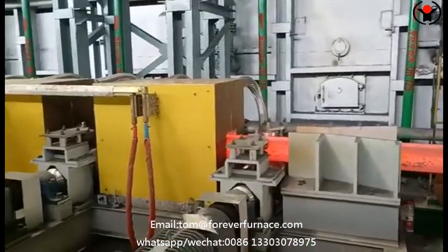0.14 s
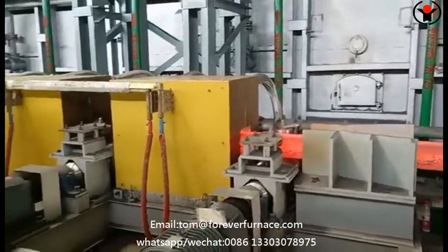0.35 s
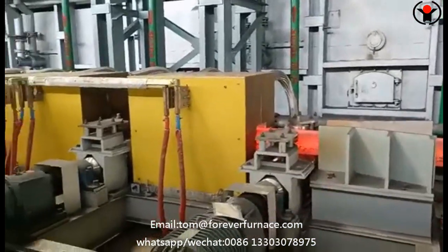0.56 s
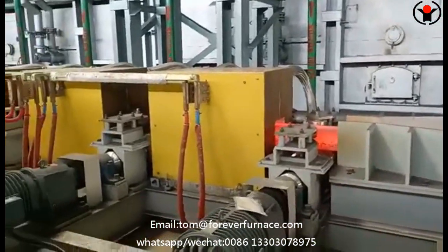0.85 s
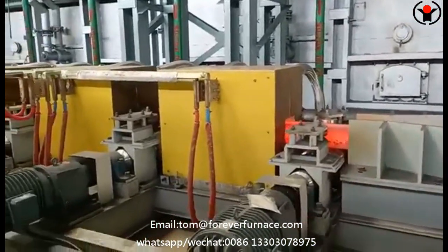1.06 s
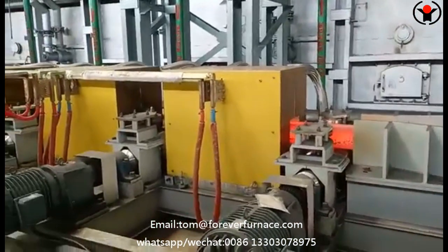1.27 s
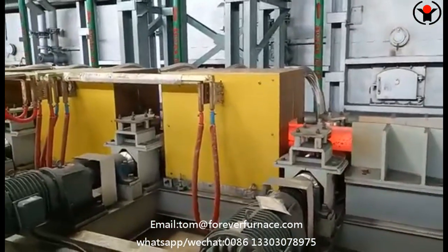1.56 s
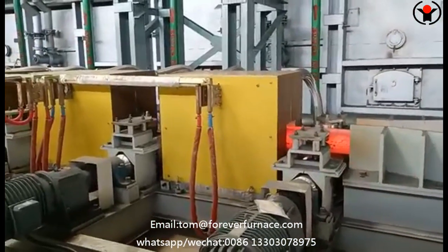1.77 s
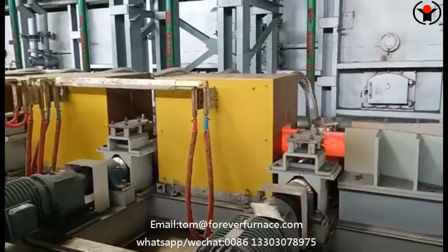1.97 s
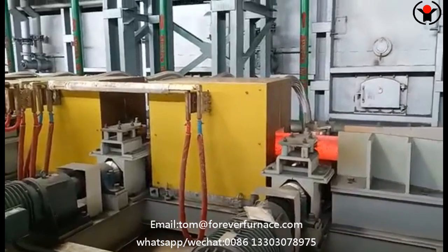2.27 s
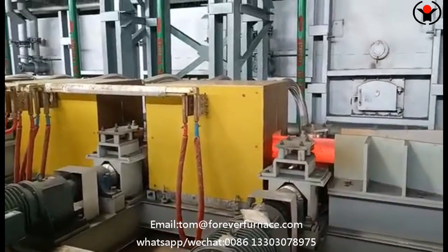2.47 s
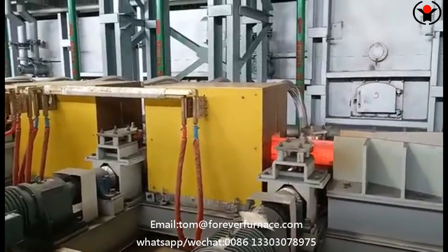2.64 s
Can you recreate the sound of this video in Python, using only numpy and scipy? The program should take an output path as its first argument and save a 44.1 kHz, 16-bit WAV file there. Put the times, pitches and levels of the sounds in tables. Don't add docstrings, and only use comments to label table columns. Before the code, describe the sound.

A piercing electrical whine dominates from 0 s, gliding from about 1525 to 1554 Hz by 2.6 s beside a weaker steady 1484 Hz tone. It is strongest early, shifts right around 0.4-1.1 s with brief pumping from 0.7 s, then thins and wavers between sides after 1.2 s as rumble and hiss come forward. Short low groans come from 0.7 to 2.7 s; no ending.

```python
import sys
import numpy as np
from scipy import signal
from scipy.fft import rfft, irfft, next_fast_len
from scipy.io import wavfile
from scipy.ndimage import uniform_filter1d, map_coordinates

SR = 44100
rng = np.random.default_rng(int(sys.argv[2]) if len(sys.argv) > 2 else 0)


def level_to_linear(level):
    exponent = np.asarray(level, float) / 20
    return 10 ** exponent


def transcribe(signal):
    frames = np.atleast_2d(signal).T
    limited = np.clip(frames, -1, 1)
    pcm = np.round(limited * 32767).astype(np.int16)
    wavfile.write(sys.argv[1], SR, pcm)


N = 123921
PORTS = np.array([[1], [-1]])


def unit(x):
    return x / np.sqrt(np.mean(x ** 2) + 1e-20)


def along(points, hz):
    f, value = np.transpose(points)
    return np.interp(np.log(hz + 1), np.log(f + 1), value)


def curves(rows):
    s, *columns = np.transpose(rows)
    t = np.arange(N) / SR
    return np.array([np.interp(t, s, column) for column in columns])


def wobble(rate):
    at = [np.arange(N) * rate / SR]
    count = int(N * rate / SR) + 4
    return np.array([map_coordinates(knots[:count], at) for knots in rng.standard_normal((2, 1500))])


def filtered(x, response):
    m = next_fast_len(N + SR // 2)
    hz = np.fft.rfftfreq(m, 1 / SR)
    return irfft(rfft(x, m) * response(hz), m)[..., :N]


def partial(phase, field, ripple_db, order):
    left_db, right_db, lead = curves(field)
    t = np.arange(N) / SR
    ripple_early_db = -9 / (1 + np.exp((t - 1.2) / 0.08))
    depth = 2 * level_to_linear(ripple_db + ripple_early_db + 3 * wobble(3))
    beat = 2 * np.pi * 33.4 * t + wobble(1.5)

    shimmer_db = 0.1 * order ** 2 * wobble(22)
    wide_skirt = level_to_linear(-25.5) * wobble(291)
    size = level_to_linear(np.array([left_db, right_db]) + shimmer_db) * (1 + depth * np.cos(beat) + wide_skirt)

    weak_left = 1 / (1 + level_to_linear(2 * (left_db - right_db)))
    left = lead[0] / 2 + np.cumsum(np.gradient(lead) * weak_left)
    drift = 0.025 * order ** 2 * wobble(16)
    skirt = level_to_linear(-28.5) * wobble(60)[0]
    lean = 0.6 * depth * np.sin(beat)
    turn = np.array([left, left - lead]) + drift + skirt + lean
    return np.sqrt(2) * size * np.sin(phase + turn)


# t/s, pitch f/Hz
CLIMB = [(0, 1525.2), (.4, 1531.9), (.8, 1538.1), (1.2, 1543.6), (1.6, 1548.3), (2, 1551.9), (2.3, 1553.4),
         (2.6, 1554), (2.81, 1553.8)]


def loaded_phase():
    return 2 * np.pi * np.cumsum(curves(CLIMB)[0]) / SR + 4.2


def steady_phase():
    return 2 * np.pi * 1484.3 * np.arange(N) / SR


# t/s, left level/dB, right level/dB, left lead/rad
LOADED_1 = [(0.03, -4.9, -5.1, -2.92), (0.15, -6.7, -7.0, -2.96), (0.21, -6.5, -6.7, -3.1),
            (0.44, -13.8, -4.8, -3.67), (0.74, -14.6, -3.6, -2.68), (0.85, -11.5, -2.0, -2.94),
            (0.95, -16.3, -3.8, -2.73), (1.02, -15.6, -4.7, -2.64), (1.12, -23.6, -8.5, -3.03),
            (1.17, -37.5, -13.2, -8.36), (1.24, -26.4, -18.8, -8.18), (1.3, -23.9, -24.1, -9.61),
            (1.34, -19.9, -17.7, -10.55), (1.41, -18.0, -13.7, -10.6), (1.48, -16.1, -21.7, -10.89),
            (1.57, -13.7, -16.6, -11.88), (1.64, -12.4, -12.1, -11.76), (1.75, -11.6, -17.3, -11.95),
            (1.83, -12.2, -17.3, -12.6), (1.87, -11.9, -12.4, -12.39), (1.9, -10.8, -11.5, -12.71),
            (2.1, -15.5, -15.0, -13.34), (2.21, -16.0, -11.8, -13.73), (2.28, -23.7, -11.0, -13.26),
            (2.41, -19.6, -15.6, -13.13), (2.76, -14.6, -21.3, -12.23), (2.78, -14.4, -19.0, -12.35)]
LOADED_2 = [(0.03, -45.3, -27.4, 1.2), (0.09, -38.4, -23.5, 1.8), (0.27, -26.3, -30.3, 0.5),
            (0.36, -35.3, -29.4, -0.4), (0.48, -32.6, -25.4, 1.2), (0.53, -27.8, -26.3, 0.8),
            (0.63, -28.8, -33.6, 1.9), (0.7, -26.5, -26.9, 2.8), (1.09, -35.6, -24.8, 4.3),
            (1.11, -41.5, -25.1, 4.5), (1.29, -22.3, -39.1, 5.6), (1.3, -21.0, -37.0, 5.8),
            (1.35, -23.1, -31.7, 6.2), (1.37, -21.9, -26.4, 6.1), (1.45, -25.3, -25.9, 6.0),
            (1.57, -24.9, -28.7, 5.7), (1.69, -32.1, -29.0, 5.1), (1.77, -36.0, -47.3, 7.8),
            (1.8, -28.7, -38.3, 3.2), (1.84, -30.1, -36.1, 4.3), (1.87, -28.2, -35.7, 4.8),
            (1.89, -25.6, -29.8, 4.5), (2.06, -33.6, -53.0, 8.0), (2.1, -30.3, -42.3, 10.3),
            (2.17, -26.8, -37.4, 11.4), (2.24, -26.5, -47.6, 13.5), (2.69, -33.3, -31.4, 12.1),
            (2.78, -31.9, -33.8, 12.2)]
LOADED_3 = [(.03, -37, -31.5, -2.3), (.15, -33.5, -48, -1.8), (.31, -31, -49, 0), (.36, -37, -50, 0),
            (.39, -29, -49, 0), (.46, -30, -49, 0), (.53, -38, -50, -.7), (.63, -32.5, -50, .5),
            (.69, -32, -42, .5), (.72, -37, -39, 2.9), (.81, -31, -43, 3.7), (.99, -43, -54, 5),
            (1.03, -30, -41, 5.6), (1.12, -32.5, -42, 7), (1.24, -42, -40.5, 9.1), (1.33, -42.5, -40.5, 11),
            (1.46, -37, -35, 10.4), (1.52, -33, -29.5, 10.6), (1.64, -35.5, -30, 10.7),
            (1.74, -37, -34, 11.3), (1.79, -38, -44, 10.9), (1.97, -42, -40, 10.1), (2.01, -43, -35, 11.5),
            (2.1, -43, -39, 12), (2.18, -44, -45, 13), (2.77, -52, -48, 15)]
LOADED_4 = [(0.03, -45.2, -44.5, -2.5), (0.79, -55.0, -41.3, -1.7), (0.81, -50.0, -38.9, -1.4),
            (0.84, -59.4, -34.4, -0.3), (0.88, -48.8, -33.1, -1.3), (1.3, -50.5, -63.2, 2.7),
            (1.31, -57.3, -52.3, 4.0), (1.33, -56.1, -44.0, 4.5), (1.34, -50.7, -52.7, 4.4),
            (1.61, -55.2, -34.2, 7.9), (1.62, -46.7, -38.8, 6.7), (1.72, -42.5, -35.7, 5.8),
            (1.76, -47.9, -35.1, 6.9), (1.77, -54.4, -34.0, 5.1), (1.97, -42.1, -35.4, 7.2),
            (2.02, -39.1, -38.8, 6.8), (2.04, -41.2, -37.8, 6.9), (2.05, -40.2, -36.2, 6.8),
            (2.31, -45.2, -39.7, 6.7), (2.71, -45.7, -48.8, 6.5), (2.78, -47.9, -44.6, 6.4)]


def loaded_coil():
    fields = [LOADED_1, LOADED_2, LOADED_3, LOADED_4]
    return sum(partial(order * loaded_phase(), field, -32, order) for order, field in enumerate(fields, 1))


# t/s, left level/dB, right level/dB, left lead/rad
STEADY_1 = [(0.03, -35.6, -17.5, -1.2), (0.53, -24.1, -19.2, 0.1), (0.98, -24.7, -16.9, 2.1),
            (1.28, -21.9, -18.1, 3.5), (1.65, -21.7, -19.1, 3.2), (1.86, -22.0, -20.1, 2.9),
            (2.09, -22.5, -20.8, 2.7), (2.16, -20.7, -21.1, 2.9), (2.24, -24.8, -22.2, 2.9),
            (2.78, -22.1, -21.0, 3.0)]
STEADY_2 = [(0.03, -50.0, -32.8, 4.4), (0.46, -49.1, -43.6, 9.0), (0.7, -56.9, -39.8, 14.9),
            (1.18, -31.1, -43.7, 13.0), (1.49, -36.6, -33.7, 15.5), (1.66, -37.5, -32.1, 16.8),
            (1.82, -36.3, -29.2, 16.9), (2.19, -40.7, -35.1, 17.8), (2.25, -37.9, -35.0, 17.7),
            (2.46, -39.4, -33.1, 17.6), (2.74, -43.3, -31.0, 16.7), (2.78, -43.8, -34.6, 16.2)]


def steady_coil():
    return partial(steady_phase(), STEADY_1, -22, 1) + partial(2 * steady_phase(), STEADY_2, -30, 2)


def faint_overtones():
    loaded_fifth = level_to_linear(-65 + 4 * wobble(3)) * np.sin(5 * loaded_phase() + wobble(2.8))
    steady_third = level_to_linear(-50 + 4.7 * wobble(20)) * np.sin(3 * steady_phase() + wobble(6.1))
    return loaded_fifth + steady_third


# f/Hz, likeness (1 = the same)
ALIKE = [(30, 0.57), (90, 1), (230, 0.88), (550, 0.64), (900, 0.015), (4500, 0.049), (8000, 0.44),
         (14000, .7)]


def rush(spectrum, patchy_db):
    z = signal.stft(rng.standard_normal((2, N)), nperseg=1024)[2]
    patches = uniform_filter1d(rng.standard_normal(z.shape[1:]), size=5, axis=0)
    patches = uniform_filter1d(patches, size=9, axis=1)
    pair = signal.istft(z * level_to_linear(patchy_db * unit(patches)), nperseg=1024)[1][:, :N]
    closed = [(1, -120)] + list(spectrum) + [(spectrum[-1][0] + 2000, -120)]

    def response(hz):
        angle = np.arccos(np.clip(along(ALIKE, hz), -1, 1)) / 2
        return level_to_linear(along(closed, hz)) * [np.cos(angle), np.sin(angle)]

    mid, side = filtered(pair, response)
    return unit(np.array([mid + side, mid - side]))


# t/s, left level/dB, right level/dB
GAIN = [(0, -3.5, -4.5), (.48, -4.5, -3.5), (.69, -4, -3.5), (.83, -7, -7), (.94, -6.5, -6.5),
        (1.15, -5, -5), (1.22, 2, 2.2), (1.35, 5, 4.5), (1.49, 2, 2.5), (1.91, 3, 1.26), (2.2, 3, 3),
        (2.39, 4, 2.5), (2.68, 4.5, 5), (2.79, 5.5, 3.5)]


def gain_db():
    return curves(GAIN)


# f/Hz, level/dB per Hz
RUMBLE = [(12, -54), (20, -33.5), (43, -22), (139, -2.5), (275, -5), (363, -5), (562, -10.5), (756, -6.5),
          (1300, -18), (1690, -50.5), (2860, -120)]
# t/s, level/dB
ROLLERS = [(0.0, -37), (0.59, -39), (0.6, -43.5), (0.68, -33.5), (0.81, -45), (1.02, -40), (1.08, -45),
           (1.2, -37.5), (1.59, -29.5), (1.68, -31.5), (2.06, -23), (2.1, -30.5), (2.18, -24.5),
           (2.34, -31.5), (2.36, -29.5), (2.81, -25)]


def rollers():
    load_db = curves(ROLLERS)[0] - gain_db().mean(axis=0)
    load_db = load_db.mean() + 0.53 * (load_db - load_db.mean())
    rumble = level_to_linear(1.5 + load_db + 0.6 * wobble(11)) * rush(RUMBLE, patchy_db=1.4)
    lag_s = 9 / 44100
    return filtered(rumble, lambda hz: np.exp(-1j * np.pi * hz * lag_s * PORTS))


# f/Hz, level/dB per Hz
HISS = [(600, -18.5), (1100, -4), (2300, -1.5), (4000, -5.5), (6800, -8.5), (8500, -22.5), (10000, -35.5),
        (12000, -56)]
# f/Hz, level/dB
LEFT_PORT = [(3000, -5.5), (6000, -2.5), (7200, -8.5), (9000, -1)]


def water_and_air():
    hiss = level_to_linear(-32 + 0.5 * wobble(5)[0] + 0.7 * wobble(14)) * rush(HISS, patchy_db=2)
    return filtered(hiss, lambda hz: level_to_linear(along(LEFT_PORT, hz) / 2 * PORTS))


# f/Hz, level/dB per Hz
WHISTLE = [(8000, -11), (10000, -9.5), (13600, -8.5), (14800, -5.5), (15700, 2), (15900, -54.5)]


def whistle():
    return level_to_linear(-64.5 + (0.7 - 1) * gain_db()) * rush(WHISTLE, patchy_db=-2.5)


# t/s, length/s, f/Hz, level/dB
GROANS = [
    (.69, 0.043, 189, -35),
    (0.975, .05, 149, -33.5),
    (1.34, 0.18, 835, -40.5),
    (1.515, .06, 198, -32),
    (1.599, .04, 128, -32),
    (2.005, 0.065, 133, -32.5),
    (2.193, .04, 215, -36.5),
    (2.705, .06, 602, -34),
]


def groans():
    t, out = np.arange(N) / SR, 0
    for s, long, hz, db in GROANS:
        resonance = lambda f: np.exp(-(np.log((f + 1) / hz) / 0.22) ** 2)
        shared, apart = filtered(rng.standard_normal((2, N)), resonance)
        apart = hz / 1200 * apart
        swell = np.exp(-((t - s) / long) ** 2)
        out = out + level_to_linear(db) * swell * unit(np.array([shared + apart, shared - apart]))
    return out


# t/s, length/s, level/dB
PUMPS = [
    (0.716, 0.051, 5),
    (0.803, 0.065, 8),
    (0.919, 0.033, 8),
    (1.007, 0.031, 6.5),
]


def pumped(x, share):
    t = np.arange(N) / SR
    step = lambda s: 0.5 + 0.5 * np.tanh((t - s) / 0.0056)
    pump_db = sum(db * (step(s) - step(s + long)) for s, long, db in PUMPS)
    pump_db = pump_db - 0.5 * (step(PUMPS[0][0]) - step(sum(PUMPS[-1][:2])))
    low = filtered(x, lambda hz: 1 / (1 + (hz / 4130) ** 8))
    return x + low * (level_to_linear(share * np.array([0 * t, pump_db])) - 1)


def scene():
    coils = loaded_coil() + steady_coil() + faint_overtones()
    hall = rollers() + water_and_air() + whistle() + groans()
    return pumped(coils, 0.36) + pumped(hall, 1)


def band_limit(x):
    return signal.sosfilt(signal.butter(12, 15800, fs=SR, output="sos"), x)


def record(dry):
    level = dry * level_to_linear(gain_db())
    knee = 24
    soft = level / (0.5 + np.abs(level) ** knee) ** (1 / knee)
    return band_limit(soft)


dry = scene()
out = record(dry)
transcribe(out)
```